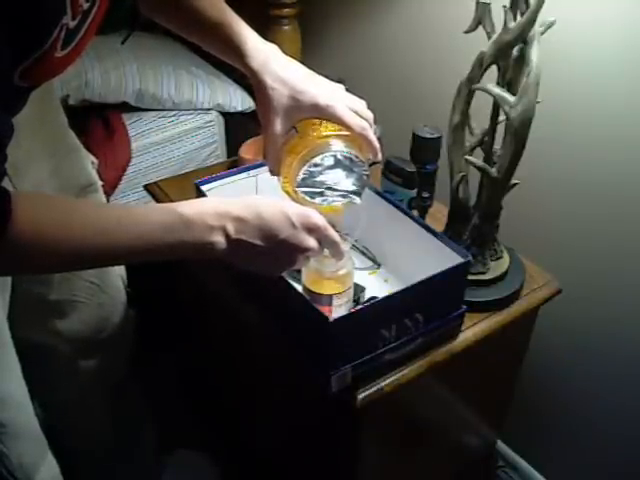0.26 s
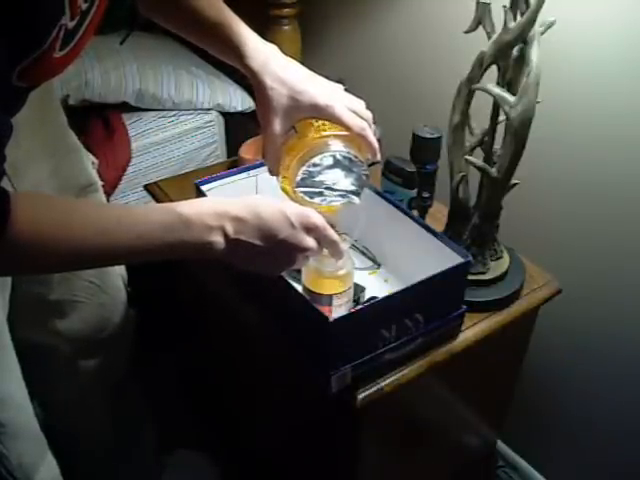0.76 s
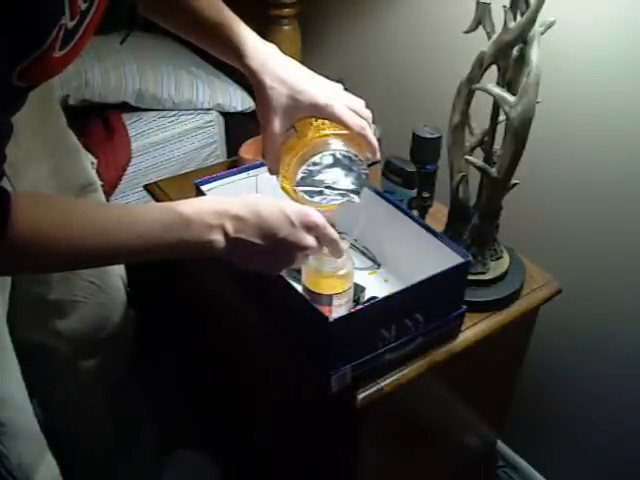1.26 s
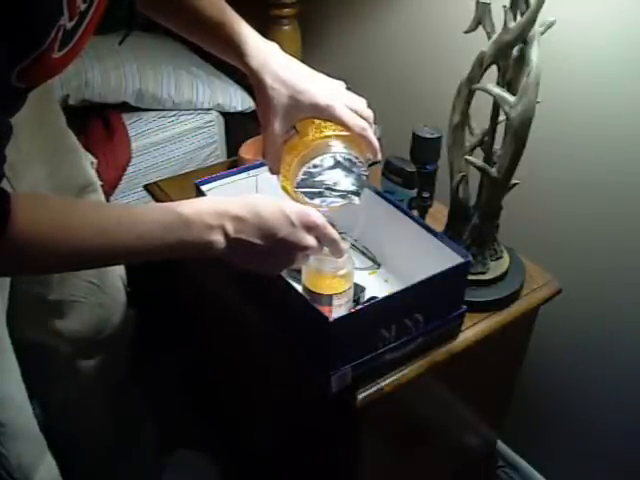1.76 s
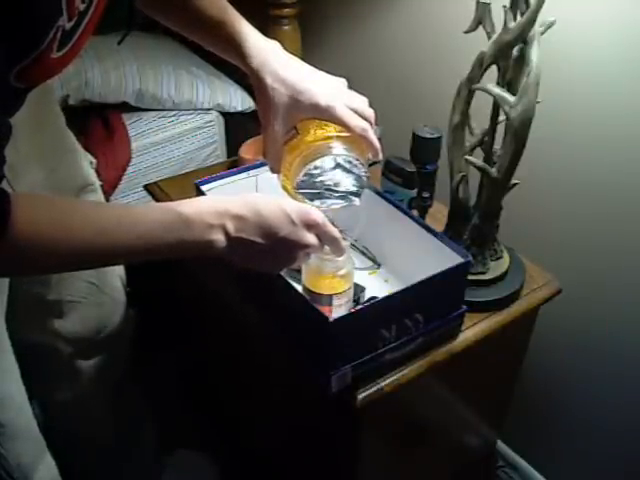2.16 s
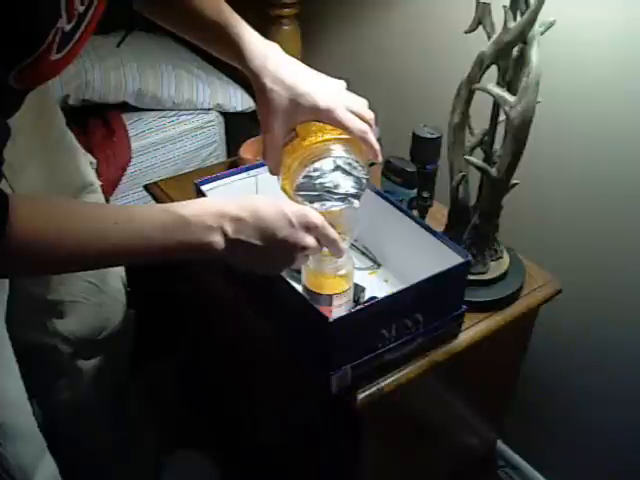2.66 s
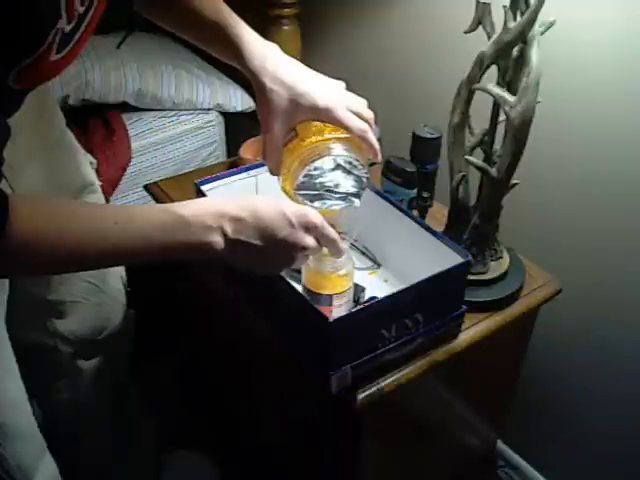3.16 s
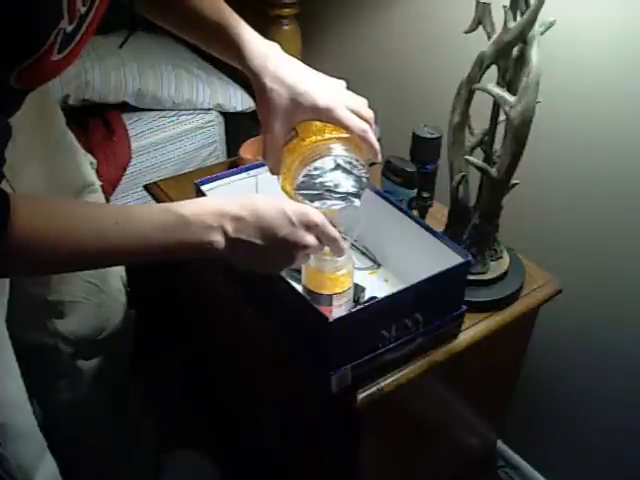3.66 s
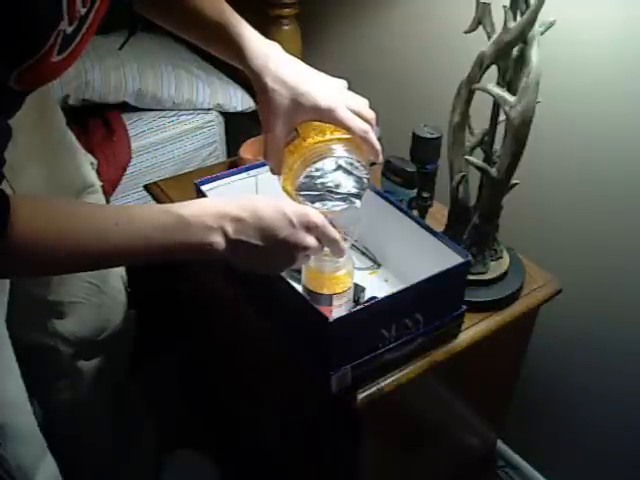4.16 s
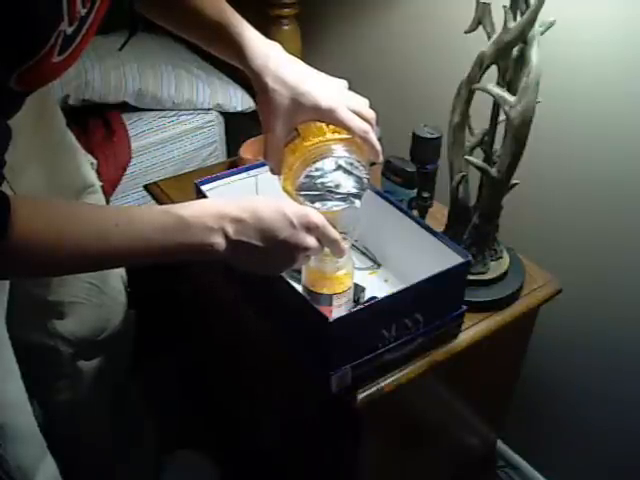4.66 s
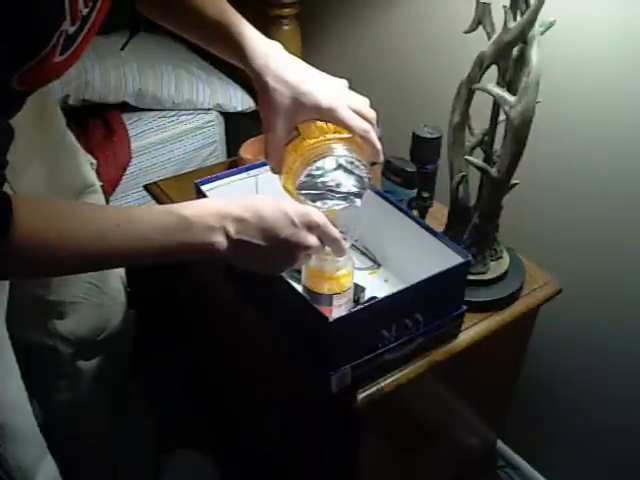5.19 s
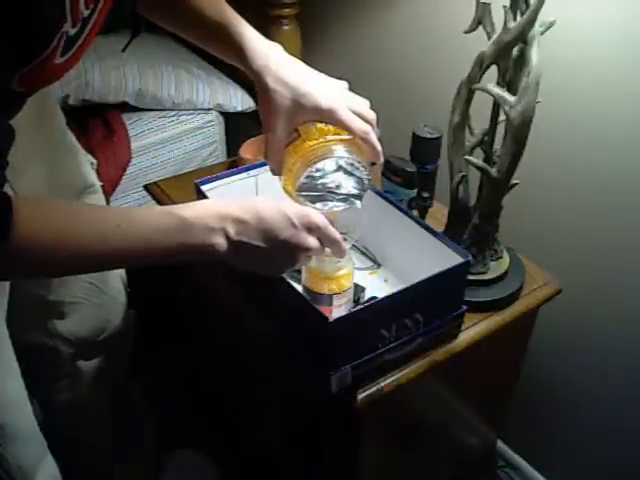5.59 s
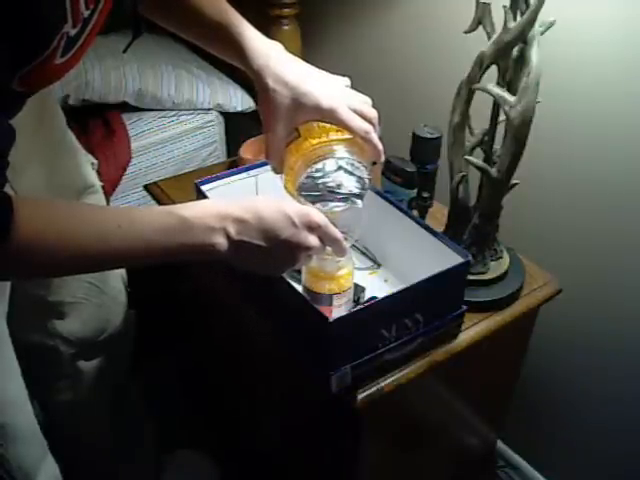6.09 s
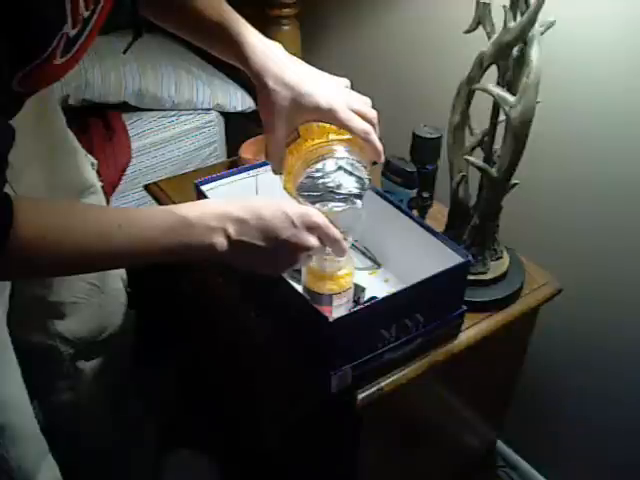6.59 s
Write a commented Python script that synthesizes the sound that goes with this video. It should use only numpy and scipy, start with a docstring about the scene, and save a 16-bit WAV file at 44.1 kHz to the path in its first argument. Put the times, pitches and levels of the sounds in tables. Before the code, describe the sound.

A dense, dry rattle of hard little pellets striking thin plastic, with sharper clicks standing out. It fades to a faint rolling trickle at about two seconds, resumes strongly by two and a half, then keeps pouring with tiny chokes and swells to the end. Close, lo-fi, distorted pickup, little bass, fizzy treble, short soft room echo, low murmur and hiss beneath.

```python
"""A quiet bedroom: small plastic pellets roll out of a tilted jar and tumble through a hand-held funnel into a
bottle. Each contact is an impulse that rings short wall modes; the stream thins to a halt and starts again. Two
dull low thumps sound over a low murmur and hiss. A cheap camera overloads, samples near 8 kHz and holds every
sample, which mirrors the rattle far up into the treble."""
import sys
import numpy as np
from scipy import signal
from scipy.io import wavfile
from scipy.ndimage import uniform_filter1d, map_coordinates

SR = 44100
rng = np.random.default_rng(int(sys.argv[2]) if len(sys.argv) > 2 else 0)


def field_ratio(decibels):
    """Amplitude ratio for a level in dB (20 dB per decade); scalars and array-likes work."""
    return 10 ** (np.asarray(decibels, dtype=float) / 20)


def store_wav(level_fs):
    """Save 16-bit WAV to argv[1]."""
    pcm = np.round(np.clip(np.atleast_2d(level_fs), -1, 1) * 32767)
    wavfile.write(sys.argv[1], SR, pcm.T.astype(np.int16))


N = 301203

# modes of the funnel and bottle wall, the dull contact tick first: frequency_hz, level_db, t60_s
FUNNEL_MODES = [(850, -14.5, 0.0017), (1464, -22, 0.019), (1592, -21, 0.012), (2093, -19, 0.018),
                (2540, -11, 0.0078), (2765, -14, 0.023), (2860, -10, 0.018), (3455, -8, 0.011),
                (3767, -5.5, 0.011), (3942.4, -3, 0.019)]


def walk(rate_hz):
    """Band-limited random modulation: independent values held, then slewed linearly; spread near 0.3."""
    hold = int(SR / rate_hz)
    steps = np.repeat(rng.standard_normal(N // hold + 1), hold)
    return 0.39 * uniform_filter1d(steps, hold)[:N]


def ring(at, size, modes, scatter_db):
    """Modal superposition: impulses at samples `at` stir each mode by an amount that varies at random."""
    chance = rng.standard_normal((len(at), len(modes), 2))
    out = np.zeros(N)
    for k, (hz, level_db, t60_s) in enumerate(modes):
        # each pellet lands elsewhere on the wall and stirs the modes differently
        sign = np.sign(chance[:, k, 0])
        share = sign * field_ratio(level_db + scatter_db * chance[:, k, 1])
        fade = np.log(1000) / (t60_s * SR)
        pole = np.exp(2j * np.pi * hz / SR - fade)
        impulses = np.bincount(at, size[k] * share, N)[:N]
        wall = signal.lfilter([1], [1, -pole], impulses)
        # the air inside takes up the ring of the wall, so the note swells before it fades
        air_pole = pole * np.exp(-2.5 * fade)
        out += signal.lfilter([3.74 * fade], [1, -air_pole], wall).imag
    return out


def shower(modes, spread_db, clump_db, clump_rate_hz, count):
    """Random impacts, many faint and few strong (exponential in dB), their strength swelling in clumps; rms 1."""
    chance = rng.random((count, 2))
    at = (chance[:, 0] * N).astype(int)
    strength_db = -spread_db * np.log(1 - chance[:, 1])
    size = field_ratio(strength_db + clump_db * walk(clump_rate_hz)[at])  # clump_db multiplies the walk
    rattle = ring(at, [size] * len(modes), modes, scatter_db=4.5)
    return rattle / rattle.std()


def flow():
    """Mass flow sets the rate of impact energy: gains of stream and jar, both held back briefly by chokes."""
    # the pour: time_s, stream_db (funnel and bottle), jar_db (rolling pellets against the stream)
    pour = [(0.0, -13.5, -7.5), (0.34, -12.5, -8), (0.84, -12, -8), (1.3, -16, -8.5), (1.46, -23, 0),
            (1.8, -27, -8), (1.91, -34, -6), (2.02, -52, 5), (2.11, -50.5, 11), (2.14, -40.5, 10.5),
            (2.25, -37, 12), (2.34, -27.5, 5), (2.4, -14, -6), (2.6, -8, -7.5), (3.2, -12, -7),
            (3.7, -16, -9.5), (4.27, -20, -2.5), (4.31, -16.5, -4), (4.5, -9.5, -8.5), (5.02, -15, -8),
            (5.52, -17.5, -6.5), (5.9, -23, -1.5), (6.3, -17.5, -7.5), (6.45, -13, -8), (6.83, -14.5, -6)]
    # the funnel neck chokes for a moment: middle_s, length_s (two standard deviations), depth_db
    chokes = [(0.996, 0.037, 6.5), (1.22, 0.015, 3), (1.774, 0.032, 25), (1.935, 0.031, 24),
              (3.4, 0.051, 3), (3.522, 0.037, 10), (3.86, .04, 3), (4.024, 0.042, 7), (4.2, 0.063, 4),
              (5.06, 0.036, 3), (5.354, 0.071, 1.5), (5.47, 0.02, 14), (5.66, 0.059, 3), (5.762, 0.049, 5),
              (5.892, 0.063, 17), (6.041, 0.021, 10), (6.12, 0.026, 8), (6.213, 0.021, 14),
              (6.524, .04, 6.5)]
    t = np.arange(N) / SR
    time_s, stream_db, jar_db = np.array(pour).T
    level_db = np.interp(t, time_s, stream_db)
    for middle_s, length_s, depth_db in chokes:
        level_db = level_db - depth_db * np.exp(-.5 * (2 * (t - middle_s) / length_s) ** 2)
    return field_ratio(level_db), field_ratio(level_db + np.interp(t, time_s, jar_db))


def strikes(count=5):
    """Impact excitation: each hard strike is a blow among quick grazes and bounces on the funnel and bottle wall."""
    # pellets that strike hardest: time_s, blow_db, lower_db (lower modes against the top modes)
    hard = [(0.0177, -2.5, -1), (0.0952, 3.5, -3), (0.136, 0, -1), (0.161, 5, -5), (0.1805, 1, -5),
            (0.2202, -1.5, -7), (0.2577, -2, -4), (0.2774, -1, -5), (0.3003, 2.5, 1), (0.3318, 0, -11),
            (0.35, -2.5, 3), (0.3807, 2, -14), (0.4, 1, -8), (0.4131, 1, -6), (0.465, 0, -16),
            (0.505, -3, -16), (0.554, 3, -10), (0.5906, -9, -14), (0.6061, 1, -9), (0.6589, 3, -6),
            (0.7227, -3, 0), (0.7577, 0, -4), (0.78, 1, -5), (0.825, 7.5, -14), (0.8453, 10, -14),
            (0.9131, -2, -10), (0.9622, 4, -6), (1.0171, -5, -6), (1.051, -1.5, -8), (1.0894, 6.5, -8),
            (1.1433, -4, -9), (1.1765, 1.5, -7), (1.2131, -5, 0), (1.2521, 1, -4), (1.2894, -3, -4),
            (1.3358, -4.5, -2), (1.3702, -8, -6), (1.3904, -2, -3), (1.4212, -9, -2), (1.4423, -9, -6),
            (1.4936, -17, -6), (1.5199, -13, 1), (1.5414, -7.5, 1), (1.5743, -8, -6), (1.6123, -11.5, -6),
            (1.6312, -13, -6), (1.6616, -10, -4), (1.6848, -9.5, 1), (1.724, -9.5, -1), (1.74, -14, -2),
            (1.765, -8.5, -4), (1.7936, -6, -0.5), (1.8248, -7.5, 1), (1.8318, -9, -5), (1.8557, -8, -6),
            (1.8637, -7, -4), (1.8926, -9.5, -4), (1.9032, -15, -4), (1.9535, -15, 3), (1.9802, -15, 4.5),
            (2.0592, -30, -6), (2.1296, -19, -2), (2.1625, -23, -6), (2.2363, -20, -6), (2.3281, -9, -3),
            (2.357, -7, -4), (2.3897, 0, -4), (2.4217, -3, -6), (2.4411, -4, -6), (2.4673, 4.5, -6),
            (2.5127, 5.5, -3), (2.5726, 0.5, -3), (2.5865, 3, -6), (2.6115, 0, -6), (2.644, 0, -10),
            (2.6753, 1.5, -10), (2.7141, 1, -8), (2.7406, 3, -8), (2.813, -5, -6), (2.8744, 5, -8),
            (2.9232, 0, -10), (2.9901, -2, -4), (3.0344, 0, -7), (3.0724, -5, -6), (3.112, -4, -7),
            (3.1579, 3, -7), (3.2635, -2, -9.5), (3.3381, 2, -6), (3.402, -1, -3), (3.433, 1, -4),
            (3.4685, 2, -6), (3.5315, 2.5, -4), (3.5505, -3, -10), (3.6034, -6, -1), (3.6275, 0, -6),
            (3.6795, 1, -7), (3.7185, -3, -6), (3.7344, 0, -6), (3.7911, -2, -6), (3.8282, -7, -5),
            (3.8656, -2, -5), (3.901, -2.5, -7), (3.9249, -7, -9), (3.9424, -3, -7), (3.9983, -2, -3),
            (4.0284, -3.5, -4), (4.046, 1.5, -6), (4.0617, 2, -12), (4.148, -3.5, -2), (4.1806, 9, -6),
            (4.2787, -8, -7.5), (4.2957, 1, -8), (4.339, 1, -6), (4.3812, -4, -4), (4.3928, 6, -9),
            (4.4226, 1, -16), (4.4693, 5, -11), (4.4832, -7, -9.5), (4.512, 1, -9), (4.5444, 3, -2),
            (4.58, 3, -6), (4.6115, 1, -9), (4.6867, 3, -8), (4.7574, -2, -10), (4.7758, 1, -6),
            (4.8824, -2, -6), (4.9073, -0.5, -9), (4.9776, -5, -5), (5.0073, 0, -10), (5.1227, 2, -6),
            (5.1418, 1, -4), (5.1872, -4, -4), (5.23, -3, -8), (5.2437, 2, -7), (5.3268, -3, -7),
            (5.3987, 1, -3), (5.4173, 0.5, -9), (5.4333, 2, -6), (5.4445, 0.5, -4), (5.4756, -3, -3),
            (5.4879, 2.5, -1), (5.5377, -3, -6), (5.5677, -0.5, -5), (5.6136, -5, -2), (5.6266, 1.5, -6.5),
            (5.691, -4, -4), (5.7036, 1, -6.5), (5.7233, -1, -5), (5.7351, -0.5, -6), (5.7824, -5.5, -10),
            (5.8152, -4.5, -10), (5.8428, -2, -4), (5.869, 2, -10), (5.903, -4.5, -7), (5.9183, -0.5, -2),
            (5.9538, -5.5, -1), (5.9815, -4, 1), (6.0428, 2, -3.5), (6.0647, -4, -1.5), (6.0985, 0, -8),
            (6.1197, 0, -6), (6.1619, -4, -2), (6.1754, -1, -0.5), (6.2032, -0.5, -1), (6.2253, -1.5, -7),
            (6.2325, 1.5, -3), (6.2953, 0.5, -8), (6.3255, -1, -0.5), (6.349, 2.5, -2), (6.3754, 0, -8),
            (6.3947, -8, -9), (6.409, 3, -6), (6.4432, 3, -9), (6.4678, -1, -8), (6.5353, -7, -6),
            (6.547, -4, -11), (6.5959, -3, -6), (6.6817, -2, -9), (6.6972, 0, -8), (6.7496, 0, -11),
            (6.7792, 1, -4), (6.8084, 7, -8)]
    bounce_s = .006
    tick_db, tick_scatter_db = -2.5, 2.5  # dull contact tick against the top modes
    time_s, blow_db, lower_db = np.array(hard).T[:, :, None]
    # column 0 is the blow itself; the others fall shortly before or after it
    late = (rng.random((len(time_s), count)) - .35) * (np.arange(count) > 0)
    at = ((time_s + late * bounce_s) * SR).astype(int).ravel()
    top = field_ratio(blow_db - 9.9 * np.abs(late) - 3.2 * (late != 0))
    lower = top * field_ratio(lower_db)
    tick = top * field_ratio(tick_db + tick_scatter_db * rng.standard_normal(time_s.shape))
    # one broad tick mode, then the lower modes, then the two top modes
    size = [tick.ravel()] + [lower.ravel()] * (len(FUNNEL_MODES) - 3) + [top.ravel()] * 2
    return ring(np.clip(at, 0, N - 1), size, FUNNEL_MODES, scatter_db=0.5)


def stream(gain):
    """Granular flow: dense grazes and sparser direct hits ring the funnel and bottle wall."""
    grazes = field_ratio(-4.0) * shower(FUNNEL_MODES, spread_db=3, clump_db=2.5, clump_rate_hz=60., count=7000)
    direct_hits = field_ratio(-3.0) * shower(FUNNEL_MODES, spread_db=3, clump_db=2.0, clump_rate_hz=23.0, count=900)
    return gain * (grazes + direct_hits)


def jar(gain):
    """Rolling as a dense train of small impacts on the modes of the jar wall and heaped pellets."""
    # modes of the jar wall and heaped pellets: frequency_hz, level_db, t60_s
    jar_modes = [(1916, -2, 0.004), (2762, -3, 0.0071), (3222, 2, 0.0081), (3635, 0.5, 0.015)]
    return gain * shower(jar_modes, spread_db=2.5, clump_db=2.0, clump_rate_hz=39.0, count=12000)


def thumps():
    """Damped low resonance under an impulse: two dull low thumps."""
    # the thumps: time_s, thump_db
    knocks = [(5.139, -22), (5.866, -19)]
    # resonances of the thump: frequency_hz, level_db, t60_s
    thump_modes = [(194, 3, 0.029), (630, -10, 0.023)]
    time_s, thump_db = np.array(knocks).T
    return ring((time_s * SR).astype(int), [field_ratio(thump_db)] * len(thump_modes), thump_modes, scatter_db=4)


def room(x, size=4096):
    """Exponential reverberant decay: soft furnishings give a short echo cloud, varied as hands and jar shift."""
    t60_s, level_db, gap_s = 0.48, -8.5, .003
    t = np.arange(3 * size) / SR
    out = np.zeros(N + 4 * size)
    for start in range(0, N, size):
        # a fresh echo pattern of unit energy for every block
        tail = rng.standard_normal(len(t)) * np.exp(-np.log(1000) * t / t60_s) * (t > gap_s)
        echo = signal.fftconvolve(x[start:start + size], tail / np.sqrt(np.sum(tail ** 2)))
        out[start:start + len(echo)] += echo
    return field_ratio(level_db) * out[:N]


def quiet():
    """Stationary noise floor: band-passed noise for the low murmur of the house, white noise for microphone hiss."""
    murmur_db, hiss_db = -55.5, -43.5  # rms ahead of the camera
    band = signal.butter(2, [35, 130], "band", fs=SR, output="sos")
    murmur = signal.sosfilt(band, rng.standard_normal(N))
    return field_ratio(murmur_db) * murmur / murmur.std() + field_ratio(hiss_db) * rng.standard_normal(N)


def scene():
    """Linear superposition of the pellet sounds, their reverberation, the thumps and the noise floor."""
    stream_gain, jar_gain = flow()
    pellets = strikes() + stream(stream_gain) + jar(jar_gain)
    # the small microphone passes little bass
    bass_cut = signal.butter(2, 427, "high", fs=SR, output="sos")
    pellets = signal.sosfilt(bass_cut, pellets)
    return (pellets + room(pellets) + thumps() + quiet())[None]


def band_limit(x):
    """A steep low-pass at the top of the band."""
    return signal.sosfilt(signal.butter(12, 15630, fs=SR, output="sos"), x)


def record(dry):
    """Sample-and-hold imaging: a dull microphone is sampled slowly, overloaded and held, mirroring its spectrum."""
    clock_hz, frame_hz = 8000, 30.0455
    skip_ticks, frame_start, clock_start = .4232, .06, .025  # starts in frames and in ticks
    t = np.arange(N) / SR
    microphone = signal.butter(4, 4390, fs=SR, output="sos")
    heard = signal.sosfilt(microphone, dry[0])
    # the holding clock skips ahead at every picture frame, while the samples are taken evenly
    frame = np.floor(frame_hz * t + frame_start)
    tick = np.floor(clock_hz * t + skip_ticks * frame + clock_start)
    taken = tick * SR / (clock_hz + skip_ticks * frame_hz)
    sample = map_coordinates(heard, taken[None], order=3) / 0.78
    # the input stage rounds off peaks; far into overload its output falls again
    held = sample / (1 + np.abs(sample) ** 6.2) ** (1 / 3.26)
    top_cut = signal.ellip(6, .1, 30, 15450, fs=SR, output="sos")
    finished = signal.sosfiltfilt(top_cut, held)[None]
    return band_limit(finished)


dry = scene()
out = record(dry)
store_wav(out)
```